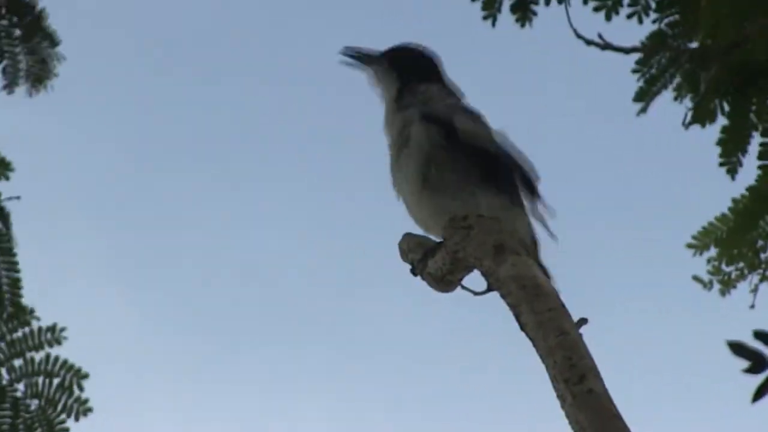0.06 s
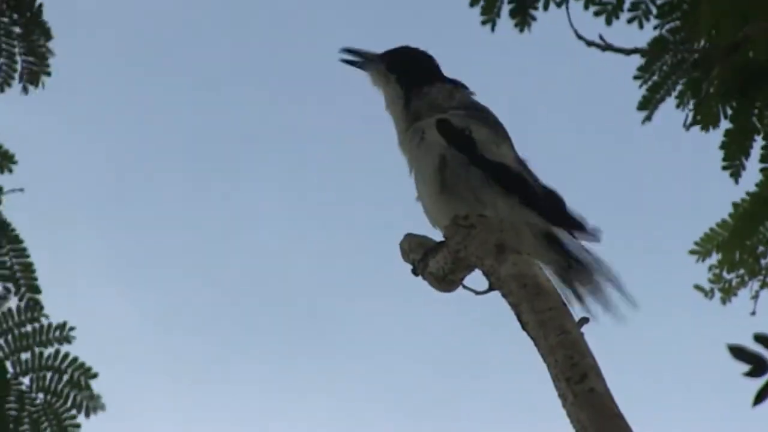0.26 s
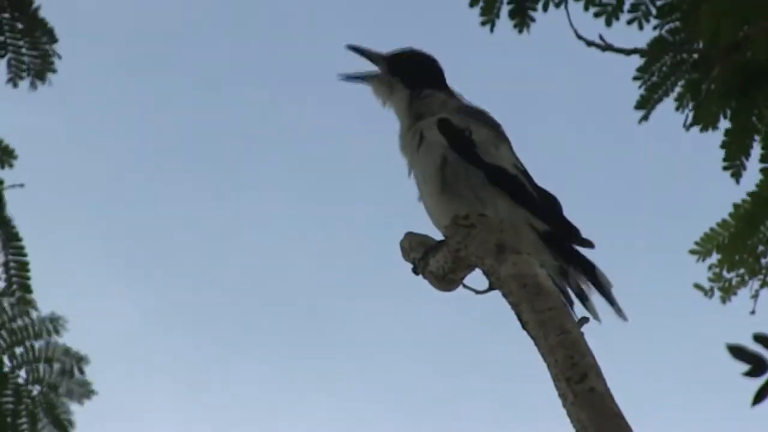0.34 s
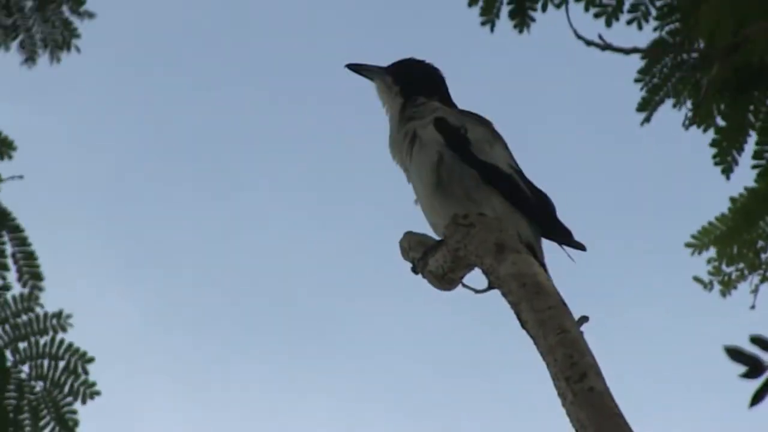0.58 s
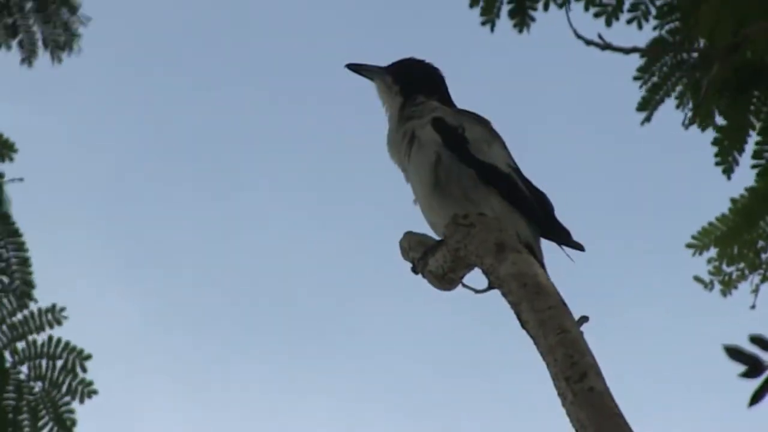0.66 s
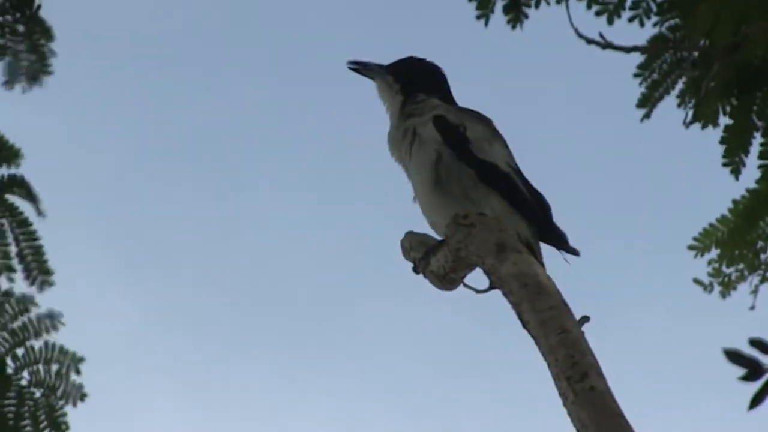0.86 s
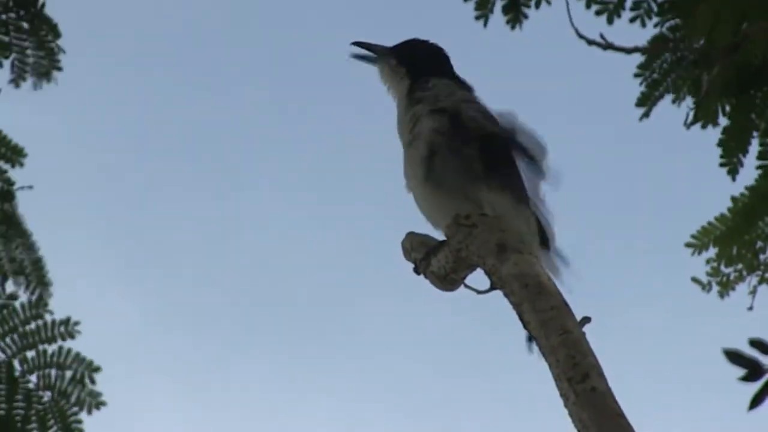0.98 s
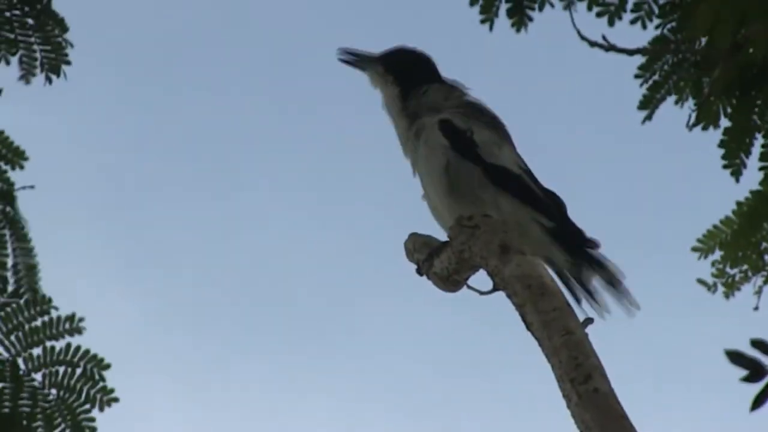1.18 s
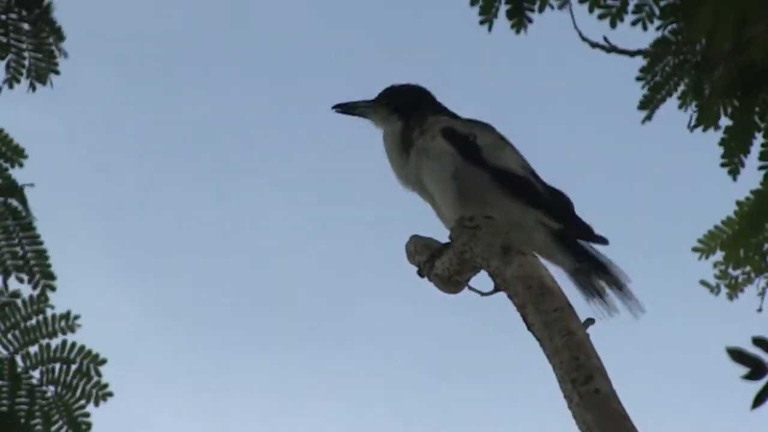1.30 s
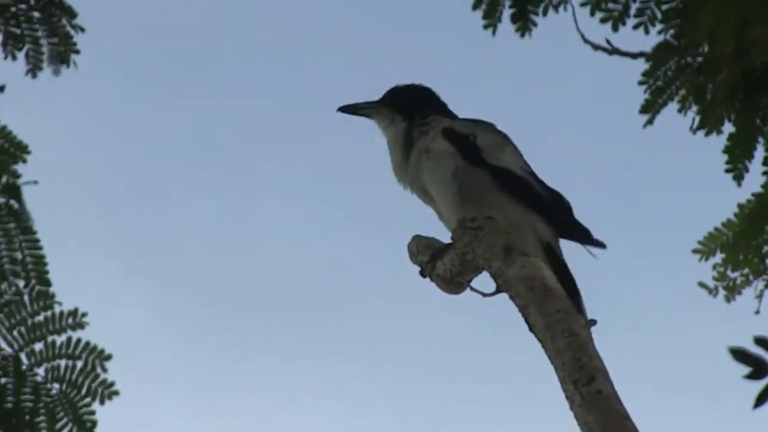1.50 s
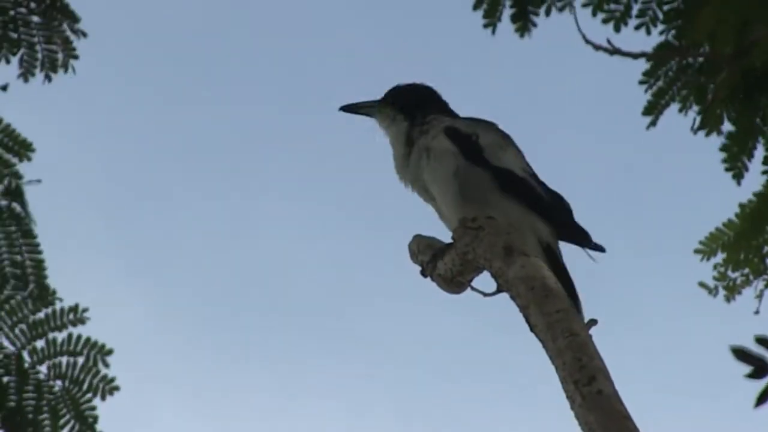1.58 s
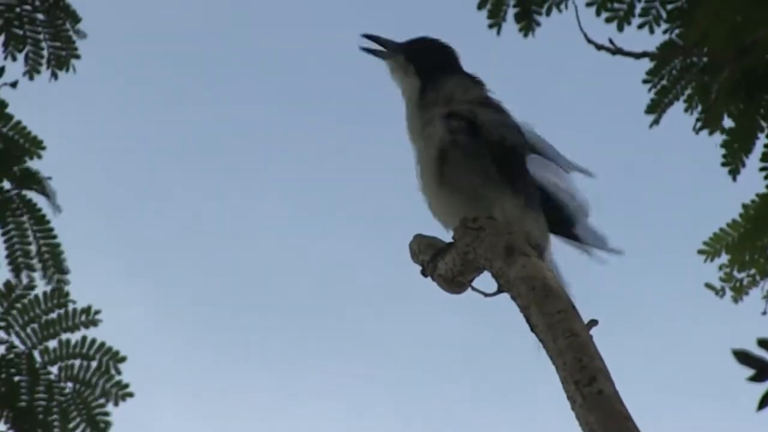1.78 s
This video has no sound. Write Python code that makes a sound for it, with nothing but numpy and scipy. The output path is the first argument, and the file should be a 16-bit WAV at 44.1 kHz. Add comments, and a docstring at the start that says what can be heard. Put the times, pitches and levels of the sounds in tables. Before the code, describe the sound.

A bird sings fluted whistles, one harsh squawk and a quick trill over distant rumble.

```python
"""A butcherbird on a branch opens with a low note and a pip, over a steady distant rumble and a low hum.
Its fluted notes are nearly pure tones, with thin bright overtones shaped by throat resonance. An upslur
breaks into a harsh squawk as the vibration turns chaotic; a fast trill follows and drops to a low note.
After a pause come a long whistle and a short one, each ending in soft low notes, while the hum fades out.
Throughout, nearby surfaces reflect the song as a faint echo."""
import sys
import numpy as np
from scipy import signal
from scipy.fft import rfft, irfft
from scipy.io import wavfile
from scipy.ndimage import map_coordinates

SR = 44100
rng = np.random.default_rng(int(sys.argv[2]) if len(sys.argv) > 2 else 0)


def dump(signal):
    """Clip the signal to [-1, 1] and save it as 16-bit WAV at the path in sys.argv[1]."""
    limited = np.clip(np.atleast_2d(signal).T, -1, 1)
    pcm = np.round(limited * 32767).astype(np.int16)
    wavfile.write(sys.argv[1], SR, pcm)


N = 81585

# Full-voiced whistles, by name: time_s, pitch_hz, tone_db, overtone_db (before the throat's gain)
WHISTLE_CURVES = { "upslur": [(.274, 812, -37, -73), (.285, 879, -31.5, -70), (.308, 935.5, -21.5, -60),
                  (.317, 947, -28, -42.5), (.331, 981, -35.5, -40.5), (.344, 997, -22, -37),
                  (.356, 1039, -18, -40.5), (.364, 1079, -15.5, -33), (.369, 1164, -29, -42.5),
                  (.375, 1159, -11.5, -37), (.38, 1342, -16, -36), (.384, 1263, -10, -32.5),
                  (.388, 1140, -22.5, -34), (.394, 1115, -35, -40.5), (.399, 1100, -20, -28)],
                  "voice break": [(.39, 1890, -31, -51), (.395, 1740, -26.5, -45), (.399, 1690, -29.5, -33),
                  (.404, 1780, -31, -31)], "long whistle": [(1.133, 1192, -36, -47),
                  (1.141, 1149, -23, -39), (1.147, 1098, -22, -40.5), (1.153, 1067, -19.5, -44.5),
                  (1.17, 1088, -19, -43.5), (1.181, 1095, -26.5, -39), (1.2, 1082, -19.5, -46),
                  (1.226, 1117, -32.5, -39.5), (1.237, 1150, -17, -38), (1.248, 1136, -15.5, -46.5),
                  (1.253, 1140, -23.5, -34.5), (1.259, 1056, -18, -48), (1.269, 988, -22, -45),
                  (1.279, 916, -37, -68), (1.292, 974, -36.5, -68)], }
# Soft, airy notes, by name: time_s, pitch_hz, tone_db, overtone_db (before the throat's gain)
SOFT_AIRY_NOTE_CURVES = { "opening low note": [(0, 770, -37, -76), (.03, 688, -33, -79),
                         (.045, 650, -56, -80)], "first pip": [(.193, 1000, -43, -54), (.2, 1064, -25, -49),
                         (.209, 1047, -32, -63), (.218, 1050, -39, -75)],
                         "trill landing": [(.762, 1009, -32, -56), (.774, 978, -24.5, -54),
                         (.785, 973, -25.5, -53), (.8, 1014, -40, -60.5)],
                         "first low note": [(.8, 747, -30.5, -79), (.812, 720, -33, -70),
                         (.84, 713, -30, -64), (.87, 697, -30.5, -69), (.893, 623, -40, -76)],
                         "second pip": [(1.112, 1260, -33.5, -42.5), (1.117, 1182, -27, -49.5),
                         (1.123, 1140, -38, -58), (1.13, 1170, -21.5, -45)],
                         "low hook": [(1.335, 600, -40, -80), (1.36, 624, -29.5, -78),
                         (1.38, 625, -31.5, -70), (1.388, 725, -44, -78), (1.398, 813, -36, -67),
                         (1.415, 655, -39, -75), (1.43, 585, -40, -77)], "lead-in": [(1.515, 620, -42, -82),
                         (1.533, 686, -41.5, -74), (1.548, 850, -36.5, -64)],
                         "short whistle": [(1.551, 1026, -38, -66.5), (1.56, 1082, -27, -50.5),
                         (1.565, 1073, -31, -51), (1.572, 979, -22.5, -68), (1.58, 1038, -24.5, -56),
                         (1.585, 1080, -39, -54), (1.59, 1043, -26, -58), (1.599, 960, -34.5, -65)],
                         "last low note": [(1.597, 814, -36, -69.5), (1.608, 714, -31, -72),
                         (1.635, 724, -32.5, -76), (1.645, 745, -39, -74), (1.66, 717, -31.5, -70.5),
                         (1.686, 704, -32.5, -75), (1.702, 650, -43, -78)], }
# Trilled note before modulation: time_s, pitch_hz, tone_db, overtone_db (before the throat's gain)
TRILL_CURVE = [(.67, 976, -33, -74), (.695, 974, -33.5, -65), (.715, 944, -25, -53.5),
               (.737, 952, -27.5, -51.5), (.761, 924, -23, -50)]
# Harsh squawk: time_s, pitch_hz, level_db (before the throat's gain), roughness (0 to 1)
SQUAWK_CURVE = [(.409, 1228, -29.5, 0.56), (.414, 1261, -22.5, 0.41), (.421, 1155, -16, 0.35),
                (.425, 1113, -25, 0.46), (.433, 1183, -26.5, 0.92), (.439, 1224, -17.5, 0.29),
                (.444, 1250, -16.5, 0), (.449, 1201, -22, 0), (.454, 1121, -36, 0.9),
                (.463, 1082, -26.5, 0.5), (.474, 908, -30.5, 0.2), (.488, 732, -42, 0.2)]
# Throat response in the full-voiced whistles: frequency_hz, gain_db
WHISTLE_THROAT_GAIN = [(1400, 6.5), (2000, -17.5), (2250, -14.5), (2900, -10.5), (3400, -23.5), (3900, -33.5),
                       (4300, -7), (4650, 2.5), (5000, -14.5), (5400, -15), (6000, -20), (6600, -16),
                       (7700, -27.5), (8800, -16.5), (9600, -18), (10800, -37), (12500, -27.5), (14200, -33),
                       (15300, -41)]
# Throat response, bill wide open: frequency_hz, gain_db
OPEN_BILL_GAIN = [(700, -19), (1250, -14), (1700, -8.5), (2150, -4.5), (2500, -4), (3100, -19), (3700, -26),
                  (4900, -24), (6200, -18), (7400, -24), (8800, -29.5), (10000, -38), (12500, -37.5),
                  (15000, -62)]
# Throat response in the soft notes: frequency_hz, gain_db
SOFT_VOICE_GAIN = [(1400, -2), (2200, -7), (3200, -19), (4200, -13.5), (4750, -10), (5050, -3.5), (5270, 2),
                   (5550, -18), (6300, -25.5), (7400, -14.5), (8200, -26.5), (8900, -19.5), (10000, -31),
                   (11500, -25.5), (12700, -21.5), (13800, -32), (15500, -41)]
# Spectral density of the distant rumble: frequency_hz, relative_db
RUMBLE_SPECTRUM = [(15, -16), (25, -27), (48, -10), (140, 1), (289, -7), (331, -10.5), (551, -12),
                   (614, -12), (684, -14), (761, -12.5), (1080, -13.5), (1340, -19.5), (2490, -27.5),
                   (3250, -34), (6200, -44), (7490, -49.5), (15500, -61)]
# Stereo width of the rumble: frequency_hz, side_minus_mid_db
RUMBLE_WIDTH = [(30, -15), (120, -27.5), (300, -17), (1000, -9.5), (3000, 0), (8000, 0.5), (14000, 0)]
# Envelope of the low hum: time_s, level_db
HUM_ENVELOPE = [(0, -49.5), (.3, -40.5), (.7, -44.5), (1.08, -46.5), (1.22, -45), (1.38, -53),
                (1.85, -62.5)]

WHISTLE_AIR_DB, SOFT_AIR_DB = -14, -8  # breath noise relative to overtone_db


def fluted_note(curve, throat, air_db, bend=1, swell=1, waver=.006):
    """Source and filter: a nearly pure tone, with weak harmonics and breath shaped by throat resonance."""
    gate, hz, tone_db, overtone_db = note_controls(curve)
    hz = hz * bend * (1 + waver * walk(rate_hz=700))
    tone = np.sin(2 * np.pi * np.cumsum(hz) / SR)
    air = undb(air_db) * unit(colour(rng.standard_normal(N), throat))
    overtones = harmonics(hz, gate, throat, lowest=2)
    return gate * swell * (undb(tone_db) * tone + undb(overtone_db) * (overtones + air))


def harmonics(hz, gate, throat, lowest, uneven_db=4.5, uneven_rate_hz=45):
    """Harmonic series: multiples of the pitch glide through fixed resonances and waver in level."""
    on, total = gate > 0, np.zeros(N)
    cycles = np.cumsum(hz)[on] / SR
    steps = np.arange(len(cycles)) * uneven_rate_hz / SR
    for k in range(lowest, 26):
        drift = np.interp(steps, np.arange(64), rng.standard_normal(64))
        uneven = undb(uneven_db * drift * (1 - 1 / k) ** 2)  # higher harmonics waver more
        wave = np.sin(2 * np.pi * (k * cycles + rng.random()))
        harmonic_hz = k * hz[on]
        total[on] += wave * uneven * response(throat, harmonic_hz) * (harmonic_hz < SR / 2)
    return total


def trill(rate_hz=95, crest_s=.7245, swing=.096, dip=.2):
    """Frequency and amplitude modulation: pitch and strength flutter in phase, a little unevenly."""
    unsteady_s = np.arange(N) / SR + .0009 * walk(rate_hz=31)
    flutter = np.cos(2 * np.pi * rate_hz * (unsteady_s - crest_s))
    bend, swell = 1 + swing * flutter, 1 + dip * (flutter - 1)
    return fluted_note(TRILL_CURVE, SOFT_VOICE_GAIN, SOFT_AIR_DB, bend, swell)


def squawk(jitter=.07, shimmer=.45, chaos_rate_hz=900, rasp_db=-4):
    """Chaotic vibration between clear peaks; the open bill's resonance favours the second harmonic."""
    gate, hz, level_db, roughness = note_controls(SQUAWK_CURVE)
    hz = hz * (1 + jitter * roughness * walk(chaos_rate_hz))
    voice = harmonics(hz, gate, OPEN_BILL_GAIN, lowest=1)
    voice *= 1 + shimmer * roughness * walk(chaos_rate_hz)
    rasp = unit(colour(rng.standard_normal(N), OPEN_BILL_GAIN)) * undb(rasp_db) * roughness
    return gate * undb(level_db) * (voice + rasp)


def note_controls(curve, edge_s=.004):
    """Envelopes of a note: a smooth gate, then each column interpolated linearly in time."""
    t, rows = np.arange(N) / SR, np.array(curve)
    times = np.sort(rows[:, 0])
    ramp = np.clip(np.minimum(t - times[0], times[-1] - t) / edge_s + .5, 0, 1)
    gate = np.sin(ramp * np.pi / 2) ** 2
    return [gate] + [np.interp(t, times, column) for column in rows.T[1:]]


def reflections(bird, echo_s=.048, echo_db=-13, tail_db=-20, t60_s=.61, onset_s=.012, pan_db=1.4):
    """Reflection and scattering: nearby surfaces add a thin echo and a faint tail to the direct sound."""
    t = np.arange(N) / SR
    echo_band = signal.butter(2, [1900, 3060], "band", fs=SR, output="sos")
    near = bird + undb(echo_db) * delay(signal.sosfilt(echo_band, bird), echo_s)
    left = near * undb(pan_db / 2)
    right = delay(near, -.000012) * undb(-pan_db / 2)  # arrives slightly ahead of the left
    decay = np.exp(-np.log(1000) * t / t60_s) * (1 - np.exp(-t / onset_s))
    scatter = (rng.standard_normal(N) + .55 * rng.standard_normal((2, N))) * decay
    tail = signal.fftconvolve(bird[None], unit(scatter) / np.sqrt(N), axes=1)[:, :N]
    return np.array([left, right]) + undb(tail_db) * tail


def distant_rumble(level_db=-38.5, flicker_db=.4):
    """Partial coherence: rumble and soft hiss widen towards the treble as the channels grow unrelated."""
    mid = colour(rng.standard_normal(N), RUMBLE_SPECTRUM)
    side = colour(colour(rng.standard_normal(N), RUMBLE_SPECTRUM), RUMBLE_WIDTH)
    return unit(np.array([mid + side, mid - side])) * undb(level_db + flicker_db * walk(rate_hz=8.84))


def low_hum(start_hz=71.55, sag_hz_per_s=3.44, waver_hz=.8):
    """Slow modulation of a sinusoid: the pitch wavers and sinks while the level swells, then fades."""
    t = np.arange(N) / SR
    hz = start_hz - sag_hz_per_s * t + waver_hz * walk(rate_hz=6.9)
    level_db = np.interp(t, *np.array(HUM_ENVELOPE).T)
    return np.sqrt(2) * np.sin(2 * np.pi * np.cumsum(hz) / SR) * undb(level_db)


def undb(db):
    """Amplitude ratio of a level in decibels."""
    return 10 ** (np.asarray(db) / 20)


def unit(x):
    """Normalisation to rms 1."""
    return x / np.sqrt(np.mean(x ** 2))


def response(points, hz):
    """Frequency response: amplitude gain along a curve of frequency_hz, gain_db."""
    frequency_hz, gain_db = np.array(points).T
    return undb(np.interp(np.log(hz + 1), np.log(frequency_hz), gain_db))


def colour(x, points):
    """Linear filtering: the spectrum is multiplied by a frequency response."""
    return irfft(rfft(x) * response(points, np.arange(N // 2 + 1) * SR / N), N)


def walk(rate_hz):
    """Smooth random fluctuation with rms 1."""
    knots = rng.standard_normal(N)
    return unit(map_coordinates(knots, [np.arange(N) * rate_hz / SR], order=2, mode="mirror"))


def delay(x, lag_s):
    """Propagation delay, interpolated between samples."""
    return map_coordinates(x, [np.arange(N) - lag_s * SR], order=3)


def scene():
    """Superposition: the song and its reflections add to the rumble and the hum."""
    whistles = sum(fluted_note(note, WHISTLE_THROAT_GAIN, WHISTLE_AIR_DB) for note in WHISTLE_CURVES.values())
    soft = sum(fluted_note(note, SOFT_VOICE_GAIN, SOFT_AIR_DB) for note in SOFT_AIRY_NOTE_CURVES.values())
    return distant_rumble() + low_hum() + reflections(whistles + soft + trill() + squawk())


def record(dry, cutoff_hz=15600):
    """Band limiting: a steep low-pass filter removes the highest treble."""
    return signal.sosfilt(signal.ellip(10, .1, 80, cutoff_hz, fs=SR, output="sos"), dry)


dry = scene()
out = record(dry)
dump(out)
```